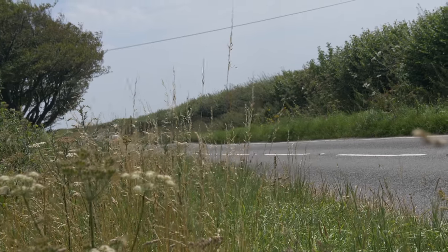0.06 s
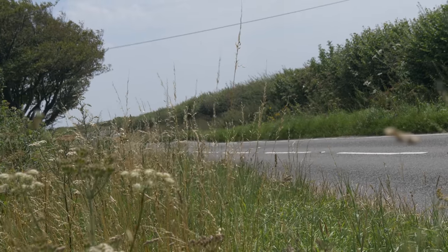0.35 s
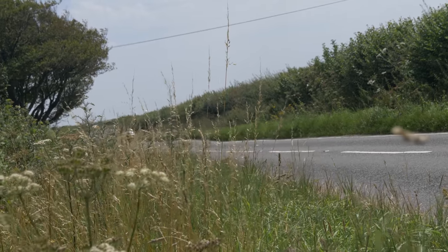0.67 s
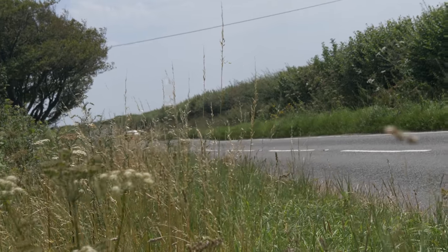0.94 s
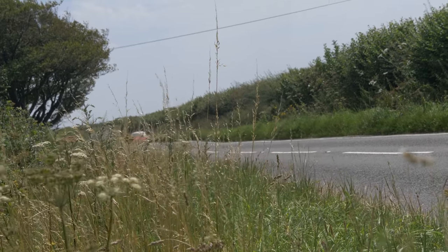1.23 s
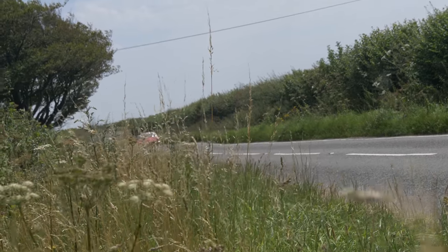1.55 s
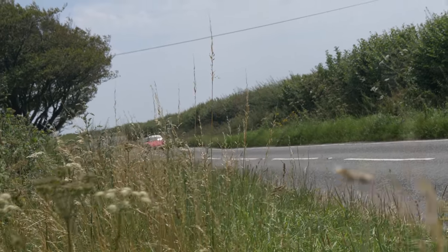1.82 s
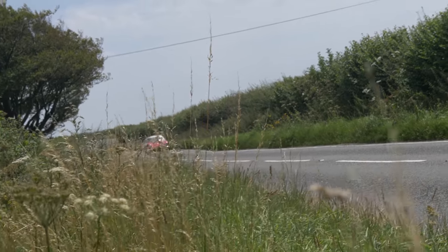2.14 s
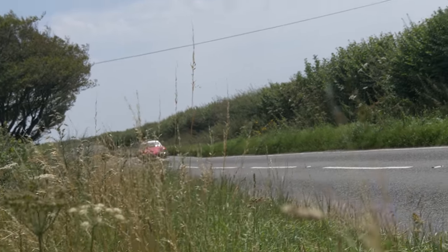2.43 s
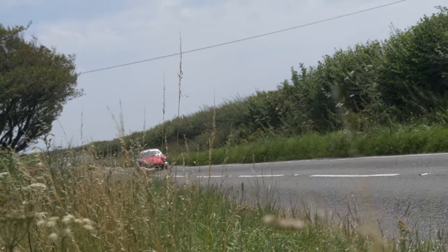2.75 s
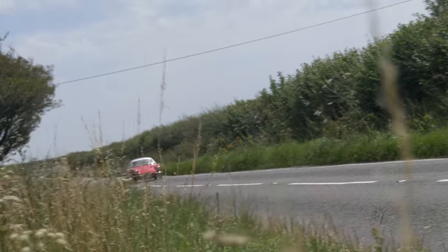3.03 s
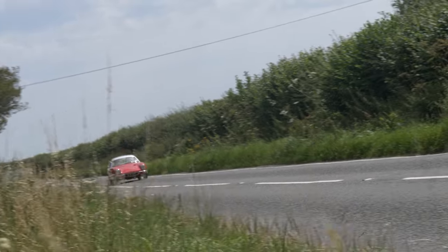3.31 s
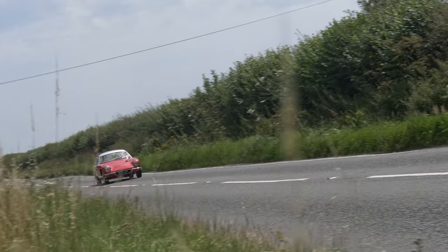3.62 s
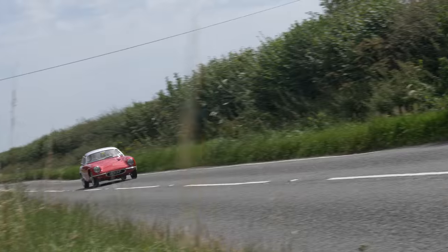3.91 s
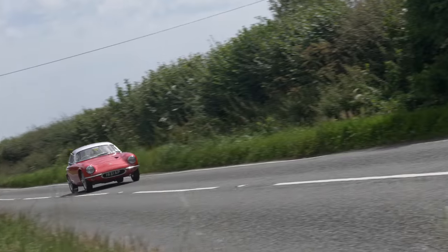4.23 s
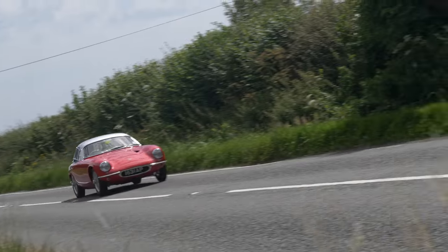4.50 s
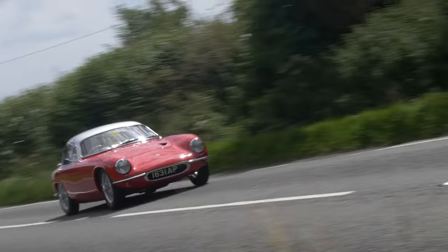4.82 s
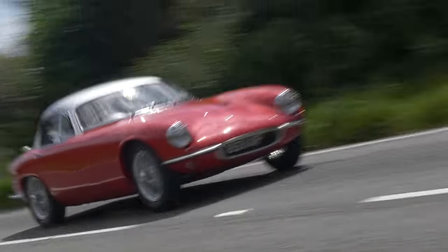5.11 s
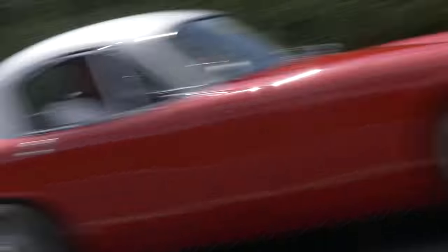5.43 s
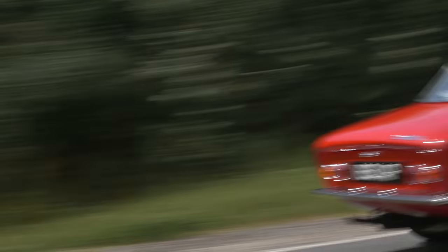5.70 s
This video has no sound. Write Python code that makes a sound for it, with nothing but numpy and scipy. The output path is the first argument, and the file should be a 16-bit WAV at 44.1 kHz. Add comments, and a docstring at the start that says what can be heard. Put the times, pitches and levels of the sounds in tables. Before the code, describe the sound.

A small sports car approaches from far along a country road and passes close by, its engine note dropping in pitch.

```python
"""A country road: a small four-cylinder sports car comes up, eases off, pulls again and passes close by.
Its exhaust boom carries from afar; nearer come intake snarl, clatter and tyre roar, then the tailpipe's
rasp as the pitch drops. Distance, bearing and throttle set the car's levels; its motion sets the Doppler
shift. A far rush dies away early, a faint whine hangs on, insects tick in the verge and a breeze nudges
the microphone. Gain control holds the pass down."""
import sys
import numpy as np
from scipy import signal
from scipy.fft import rfft, irfft, next_fast_len
from scipy.io import wavfile
from scipy.ndimage import uniform_filter1d, map_coordinates

SR = 44100
rng = np.random.default_rng(int(sys.argv[2]) if len(sys.argv) > 2 else 0)


def pcm_store(signal):
    """Save signal as 16-bit PCM."""
    levels = np.round(np.clip(np.atleast_2d(signal), -1, 1) * 32767)
    wavfile.write(sys.argv[1], SR, levels.astype(np.int16).T)


N = 253859
TIME_S = np.arange(N) / SR
SPEED_M_PER_S, SOUND_M_PER_S = 24, 343
PASS_S, CLOSEST_M = 5.65, 4.8


def amp(db):
    """Decibels to gain."""
    return 10 ** (np.asarray(db) / 20)


def unit(x):
    """Scale to rms 1."""
    return x / np.sqrt(np.mean(x ** 2) + 1e-20)


def bump(at_s, width_s):
    """Bell of height 1; falls to 1/e at width_s either side."""
    return np.exp(-((TIME_S - at_s) / width_s) ** 2)


def step(x):
    """Smooth step from 0 to 1 around x = 0."""
    return .5 + .5 * np.tanh(x / 2)


def curves(rows):
    """One value per sample for each column after the time."""
    times_s, *columns = np.transpose(rows)
    return [np.interp(TIME_S, times_s, column) for column in columns]


def wobble(rate_hz):
    """Smooth random curve, rate_hz knots a second."""
    knots = rng.standard_normal(int(N * rate_hz / SR) + 4)
    return map_coordinates(knots, [TIME_S * rate_hz])


def filtered(x, response):
    """Apply the gain response(hz) to x."""
    size = next_fast_len(N + SR // 2)
    return irfft(rfft(x, size) * response(np.fft.rfftfreq(size, 1 / SR)), size)[:N]


def noise(spectrum, patchy_db):
    """Noise of rms 1 with drifting patches of gain; spectrum rows: f/Hz, relative density/dB."""
    frames = signal.stft(rng.standard_normal(N), nperseg=1024)[2]
    patches = uniform_filter1d(rng.standard_normal(frames.shape), size=6, axis=0)
    patches = uniform_filter1d(patches, size=14, axis=1)
    patchy = signal.istft(frames * amp(patchy_db * unit(patches)), nperseg=1024)[1][:N]
    knots_hz, db = np.transpose(spectrum)
    return unit(filtered(patchy, lambda hz: amp(np.interp(np.log(hz + 1), np.log(knots_hz), db))))


# Breeze puffs: t/s, half-width/s, level/dB
BREEZE_PUFFS = [(.35, 0.029, -49), (.465, 0.027, -47), (.71, 0.028, -50), (2.85, 0.17, -58),
                (3.9, 0.078, -47)]

def breeze():
    """Wind on the microphone: a low, wavering rumble with puffs."""
    spectrum = [(12, -14), (30, -14), (60, -8), (100, -7.5), (250, -19.5), (900, -87)]
    puffs = sum(amp(db) * bump(at_s, width_s) for at_s, width_s, db in BREEZE_PUFFS)
    return (amp(-56 + .83 * wobble(5.5)) + puffs) * noise(spectrum, patchy_db=-.5)


# Hiss of air and road: f/Hz, relative density/dB
HISS_SPECTRUM = [(2000, -35), (4200, 3), (5500, 0.5), (7000, -1), (9500, -2.5), (12000, -8.5), (15500, -18)]

def hiss(level_db, patchy_db):
    """High, broad hiss."""
    return amp(level_db) * noise(HISS_SPECTRUM, patchy_db)


# Cricket buzz: f/Hz, relative density/dB
CRICKET_SPECTRUM = [(9000, -32), (12000, -11), (13500, -6), (15800, -7)]

def bush_cricket(stroke_hz=96.7):
    """Thin buzz in the grass: high noise pulsed by wingstrokes."""
    strokes = np.sin(2 * np.pi * stroke_hz * TIME_S + .5 * wobble(3))
    return amp(-67 + 1.2 * wobble(4)) * unit(amp(4.5 * strokes)) * noise(CRICKET_SPECTRUM, patchy_db=2)


# Insect ticks: t/s, relative peak/dB, f/Hz
INSECT_TICKS = [(0.8394, -58, 13400), (1.699, -57, 11850), (2.0544, -56, 12530), (2.0844, -64, 13400),
                (2.5825, -56, 10960), (2.6044, -58, 13300), (2.9776, -51, 10100), (2.9975, -50, 10200),
                (3.0565, -54, 12900)]

def insect_ticks(width_hz=1800, rise_s=.0043):
    """Insects in the verge: short bursts of high noise."""
    ticks = np.zeros(N)
    for at_s, db, pitch_hz in INSECT_TICKS:
        age = np.maximum(TIME_S - at_s, 0) / rise_s
        band = filtered(rng.standard_normal(N),
                        lambda hz: np.exp(-((hz - pitch_hz) / width_hz) ** 2) + .4 * (hz > pitch_hz))
        ticks += amp(db - 7) * age * np.exp(1 - age) * unit(band)
    return ticks


# Far rush: f/Hz, relative density/dB
FAR_SPECTRUM = [(300, -4), (560, -4), (850, -9.5), (1000, -5), (1250, 0), (1480, -6.5), (1650, -1.5),
                (1950, -2), (2500, -10), (2900, -8.5), (3750, -11.5), (4100, -18), (4600, -19.5),
                (5500, -38)]

def far_rush(peak_s=.31, rise_s=.46, fall_s=.89):
    """Hollow, distant rush that swells once and dies away."""
    swell = np.where(TIME_S < peak_s, bump(peak_s, rise_s), bump(peak_s, fall_s))
    return amp(-48.5) * swell * noise(FAR_SPECTRUM, patchy_db=1.3)


# Whine: t/s, f/Hz, level/dB
WHINE_TRACK = [(0, 446, -59), (.5, 443.5, -68), (1.3, 430.7, -61), (3, 433.3, -57.5), (3.6, 430, -49),
               (4.2, 445, -75)]

def whine():
    """Faint, wavering tone, heard while the car is still far."""
    pitch_hz, level_db = curves(WHINE_TRACK)
    phase = 2 * np.pi * np.cumsum(pitch_hz) / SR
    return amp(level_db + 2.9 * wobble(9.9)) * np.sin(phase + .43 * wobble(14))


# Car sounds by name: level at 20 m/dB, ground and air loss/(dB/m), shut-throttle gain/dB, flank gain/dB
PROPAGATION = { "boom": (-19.5, 0.0831, -0.5, 6), "second": (-24.5, 0.52, -6.5, 1),
               "third": (-28.5, 0.86, -4, -9.5), "hedge": (-39.5, 0.02, -1.5, -5),
               "front": (-22.5, 0.62, -33, -15.5), "intake": (-26, 0.28, -5.5, 1),
               "pipe": (-47, 0.74, -6, 15.5), "rumble": (-31, 0.1748, -0.5, -4.5),
               "roar": (-25, 0.21, 1.15, -7.5), "rush": (-29, 0.1971, -2.5, -5.5),
               "hiss": (-42, 0.28, -7.5, -6), "spray": (-53, 0.7, 2, -6.5)}

def car_levels_db(distance_m, bearing_deg, throttle_s=3.22, opening_s=.087, reference_m=20,
                  flank_deg=40.3, turn_deg=4.1, intake_beam_deg=14.2):
    """Level of each car sound from distance, throttle and the side shown; the intake beams forward."""
    shut = np.exp(-np.maximum(TIME_S - throttle_s, 0) / opening_s)
    flank = step((bearing_deg - flank_deg) / turn_deg)
    spread_db = 20 * np.log10(reference_m / distance_m)
    level_db = {}
    for name, (db, loss_db_per_m, shut_db, flank_db) in PROPAGATION.items():
        loss_db = loss_db_per_m * (distance_m - reference_m)
        level_db[name] = db + spread_db - loss_db + shut_db * shut + flank_db * flank
    level_db["intake"] -= 10 * np.log10(1 + (bearing_deg / intake_beam_deg) ** 8)
    return level_db


# Sizzle: f/Hz, relative density/dB
SIZZLE_SPECTRUM = [(2400, -17), (3100, -3.5), (3650, 1.5), (4300, -6.5), (6500, -14), (9000, -17.5),
                   (13000, -25)]
# Its swells: t/s, half-width/s, level/dB
SIZZLE_SWELLS = [(2.401, 0.21, -66), (3.7, 0.39, -49), (4.88, 0.11, -46), (5.3, 0.077, -36)]

def sizzle():
    """Narrow sizzle that comes in swells as the car nears."""
    swells = sum(amp(db) * bump(at_s, width_s) for at_s, width_s, db in SIZZLE_SWELLS)
    return swells * noise(SIZZLE_SPECTRUM, patchy_db=3.5)


# Tyre and air noise bands, low to high: f/Hz, relative density/dB
RUMBLE_SPECTRUM = [(30, -33), (48, -15), (62, -2), (85, -3.5), (110, -0.5), (200, 1.5), (250, -2), (310, 0),
                   (400, -5), (520, -5.5), (800, -10.5), (2000, -81)]
ROAR_SPECTRUM = [(200, -43), (480, -11), (640, -3.5), (800, 1), (950, 1), (1100, -1), (1450, -3.5),
                 (1900, -7.5), (2800, -16.5), (6000, -60)]
RUSH_SPECTRUM = [(600, 1), (1200, -3.5), (1700, -2), (2050, 1), (2500, -5.5), (3100, -9), (3500, -8.5),
                 (4400, -16.5), (6000, -27.5), (12000, -58)]
SPRAY_SPECTRUM = [(6000, -44), (9000, 4), (12000, -2), (15500, 1.5)]
# Swells of the roar and of the treble: t/s, gain/dB
ROAR_SWELL = [(0, 4), (.6, -1.5), (1.33, 3.5), (1.55, 1.7), (1.85, 2), (2.1, 1.5), (2.35, 2), (2.6, 0),
              (3.4, 1), (3.7, 0.8), (4.35, -0.3), (4.6, 1.55), (4.87, 1), (5.1, -1), (5.31, 1),
              (5.54, -3.5), (5.66, 0.5), (5.76, -7)]
TREBLE_SWELL = [(2.2, -2), (3, 2.5), (3.45, 0), (3.7, 3), (4.35, 0), (4.7, -1), (4.87, 0.5), (5.1, -1.5),
                (5.22, 1), (5.32, 3), (5.4, -1), (5.53, -2), (5.67, -1), (5.76, -5.5)]

def road_noise(phase, distance_m, level_db, clatter_depth=.3, reach_m=25, crest_s=.63, patchy_db=1.1):
    """Tyre roar and rushing air come over a crest; close by, engine clatter pulses through them."""
    near = 1 / (1 + (distance_m / reach_m) ** 2)
    firings = np.cos(phase) + .32 * np.cos(2 * phase) + .13 * np.cos(phase / 2)
    clatter = unit(np.exp(clatter_depth * near * firings))
    hidden = step((crest_s - TIME_S) / .058)
    swell_db, = curves(ROAR_SWELL)
    treble_db, = curves(TREBLE_SWELL)
    rumble = amp(level_db["rumble"] - 3 * hidden) * noise(RUMBLE_SPECTRUM, patchy_db)
    roar = amp(level_db["roar"] + swell_db - 6.1 * hidden) * noise(ROAR_SPECTRUM, patchy_db)
    rush_db = level_db["rush"] + 1.2 * swell_db + .23 * treble_db - 4 * hidden
    rush = amp(rush_db) * noise(RUSH_SPECTRUM, patchy_db)
    road_hiss = hiss(level_db["hiss"] + treble_db, patchy_db=.8)
    spray = amp(level_db["spray"] + treble_db) * noise(SPRAY_SPECTRUM, patchy_db=1)
    return rumble + clatter * (roar + rush) + np.sqrt(clatter) * (road_hiss + spray)


# Lobes: order (multiple of the firing rate), t/s, half-width/s, gain/dB
ORDER_LOBES = [(1, 5.26, 0.073, -3.5), (1, 5.39, 0.041, 2), (1, 5.625, 0.044, -16), (1, 5.76, .09, -6),
               (2, 5.2, 0.12, -7.5), (2, 5.38, 0.038, 1), (2, 5.56, 0.13, -17.5), (2, 5.76, 0.07, -5),
               (3, 5.25, 0.07, 3.5), (3, 3.8, 0.09, 2), (3, 5.415, 0.055, -14), (6, 5.39, 0.028, 5.5),
               (6, 5.58, 0.048, -18), (8, 4.58, 0.15, 4), (8, 5.6, .08, -1), (8, 5.48, 0.054, -8),
               (9, 3.49, 0.4, 4), (7, 5.49, 0.069, -15.5), (7, 5.645, 0.037, 3.5), (7, 5.76, 0.056, -10)]

def lobes_db(order):
    """Brief cancellations and swells of one engine order as the car moves."""
    return sum(db * bump(at_s, width_s) for k, at_s, width_s, db in ORDER_LOBES if k == order)


# Engine from ahead, intake snarl, tailpipe rasp: order, relative level/dB
FRONT_ORDERS = [(.5, -14), (1.5, -17), (1.75, -10), (2.25, -19), (2.75, -8), (3.25, -13), (3.5, -13),
                (4, -2), (4.5, -18), (4.75, -13), (5, 0), (5.25, -7), (5.5, -8), (6, -2.5), (6.25, -16),
                (6.5, -10), (7, -4), (7.25, -12), (7.5, -15), (8, -7), (8.5, -13), (9, -11), (9.5, -11),
                (10, -12), (11, -16), (12, -20), (13, -17), (14, -16)]
INTAKE_ORDERS = [(4, -2), (5, -11), (6, -11), (7, 0), (8, 0), (9, 0), (10, -4), (11, -11), (12, -14),
                 (14, -12), (15, -13)]
PIPE_ORDERS = [(1.5, -17), (3.5, -14), (4, -2), (4.5, -16), (5, -4), (6, -7), (6.5, -13), (7, 2),
               (7.5, -10), (8, -5), (9, -17), (10, -18), (11, -20)]

def engine_orders(phase, firing_hz, distance_m, level_db, blur_rad,
                  reflection=.7, closest_lag_s=.00207, flutter_db=1.1, jitter_rad=.07):
    """Engine, intake and tailpipe share orders; each leads in turn as the car comes and draws level."""
    lag_s = closest_lag_s * (CLOSEST_M / distance_m) ** 1.54
    powers = {}
    for name, orders in [("front", FRONT_ORDERS), ("intake", INTAKE_ORDERS), ("pipe", PIPE_ORDERS)]:
        scale = amp(level_db[name]) ** 2 / sum(amp(db) ** 2 for _, db in orders)
        for order, db in orders:
            share = scale * amp(db) ** 2
            if name == "front":  # the road's reflection sweeps a notch down through the lines
                share *= 1 + reflection * np.cos(2 * np.pi * order * firing_hz * lag_s)
            powers[order] = powers.get(order, 0) + share
    sound = np.zeros(N)
    for order, power in powers.items():
        # whole orders join into one pulse a firing; unequal cylinders add lines between at any phase
        offset_rad = rng.standard_normal() * (np.pi if order % 1 else .62 + blur_rad)
        gain = np.sqrt(2 * power) * amp(lobes_db(order) + flutter_db * wobble(9))
        sound += gain * np.cos(order * phase + offset_rad + jitter_rad * wobble(24))
    return sound


def hedge_scatter(phase):
    """Hedges scatter a blurred copy of the first three exhaust orders."""
    return sum(amp(db) * (wobble(rate_hz) * np.cos(order * phase) + wobble(rate_hz) * np.sin(order * phase))
               for order, db, rate_hz in [(1, 0, 55), (2, -5.5, 80), (3, -7, 40)])


# Exhaust effort as the driver eases off and pulls again: t/s, gain/dB
EXHAUST_EFFORT = [(0, -6), (.3, -0.5), (1.1, 0.5), (1.7, 0), (1.78, 1.5), (2.35, -1), (2.62, -3),
                  (3.15, -7), (3.36, -1), (4.2, -0.8), (4.7, .5)]

def exhaust_boom(phase, level_db, blur_rad, throb_s=2.89, throb_hz=17, flutter_db=2, jitter_rad=.25):
    """Boom at the firing rate plus two overtones; it throbs just before the throttle opens."""
    effort_db, = curves(EXHAUST_EFFORT)
    throb_db = 4 * bump(throb_s, width_s=.13) * np.cos(2 * np.pi * throb_hz * (TIME_S - throb_s))
    boom_db = level_db["boom"] + effort_db + lobes_db(order=1) + throb_db + .45 * wobble(25)
    boom = amp(boom_db) * np.cos(phase + .15 * wobble(20))
    for order, name, flutter_hz, jitter_hz in [(2, "second", 18, 28), (3, "third", 20, 25)]:
        gain = amp(level_db[name] + lobes_db(order) + flutter_db * wobble(flutter_hz))
        boom += gain * np.cos(order * phase + (order - 1) * blur_rad + jitter_rad * wobble(jitter_hz))
    return np.sqrt(2) * boom


def scene():
    """The car drives a straight path past the verge; one Doppler-shifted phase times its firings."""
    ahead_m = SPEED_M_PER_S * (PASS_S - TIME_S)
    distance_m = np.hypot(ahead_m, CLOSEST_M)
    bearing_deg = np.degrees(np.arctan2(CLOSEST_M, ahead_m))  # microphone off the car's nose
    passing = sports_car(distance_m, bearing_deg) + sizzle()
    background = whine() + far_rush() + insect_ticks() + bush_cricket() + breeze()
    return (passing + background + hiss(level_db=-68, patchy_db=.5))[None]


# Firing rate at the engine: t/s, f/Hz
FIRING_RATE = [(0, 138.6), (.3, 136.6), (1, 135.05), (2, 130.8), (2.5, 129.55), (3, 129.5), (3.2, 128.75),
               (4, 134.1), (4.8, 140.1), (5.2, 142.8), (5.42, 143.8), (5.6, 146), (5.76, 145.7)]

def sports_car(distance_m, bearing_deg):
    """One firing phase drives exhaust, engine orders and clatter."""
    engine_hz, = curves(FIRING_RATE)
    firing_hz = engine_hz / (1 - SPEED_M_PER_S / SOUND_M_PER_S * np.cos(np.radians(bearing_deg)))
    phase = 2 * np.pi * np.cumsum(firing_hz) / SR
    level_db = car_levels_db(distance_m, bearing_deg)
    blur_rad = 1.1 * step((bearing_deg - 21) / 2)  # off the nose the orders drift out of step
    exhaust = exhaust_boom(phase, level_db, blur_rad) + amp(level_db["hedge"]) * hedge_scatter(phase)
    engine = engine_orders(phase, firing_hz, distance_m, level_db, blur_rad)
    return exhaust + engine + road_noise(phase, distance_m, level_db)


def record(dry, threshold_db=-17, ratio=8.8, average_s=.084, bass_cut_hz=290, top_hz=15800):
    """Gain control, less alert to bass, holds the loud pass down; nothing above top_hz is kept."""
    sensed = filtered(dry[0], lambda hz: hz / np.hypot(hz, bass_cut_hz))
    size = int(average_s * SR) + 1
    power = np.abs(uniform_filter1d(uniform_filter1d(sensed ** 2, size=size), size=size))
    over_db = np.maximum(10 * np.log10(power + 1e-12) - threshold_db, 0)
    gain = amp(-over_db * (1 - 1 / ratio))
    return filtered(gain * dry[0], lambda hz: hz < top_hz)[None]


dry = scene()
out = record(dry)
pcm_store(out)
```